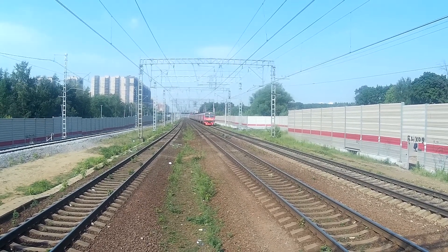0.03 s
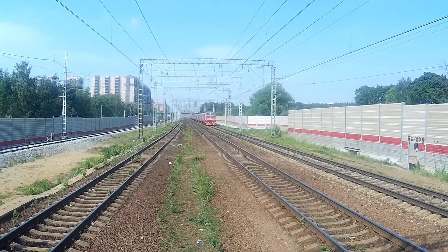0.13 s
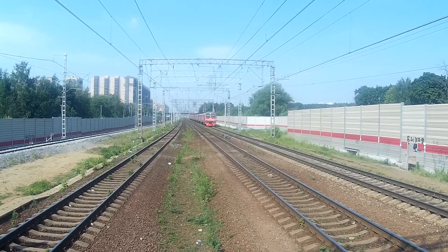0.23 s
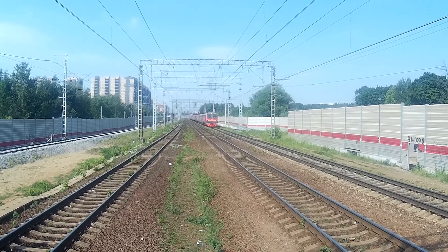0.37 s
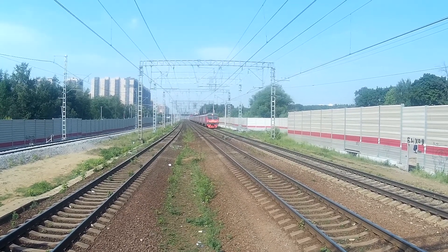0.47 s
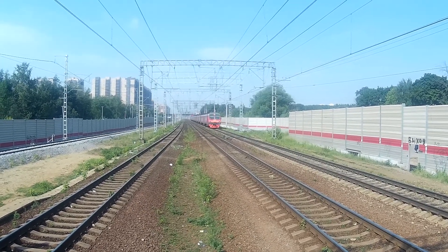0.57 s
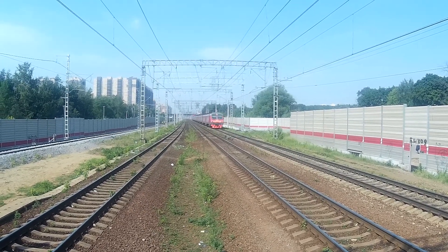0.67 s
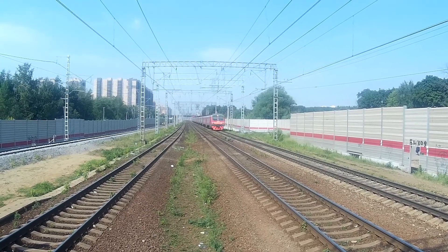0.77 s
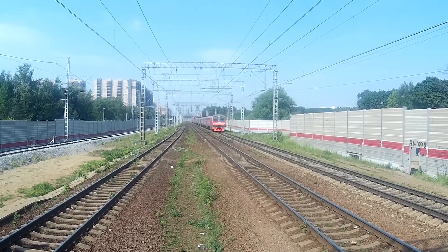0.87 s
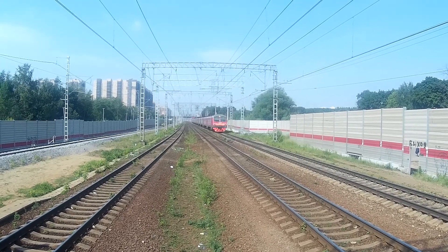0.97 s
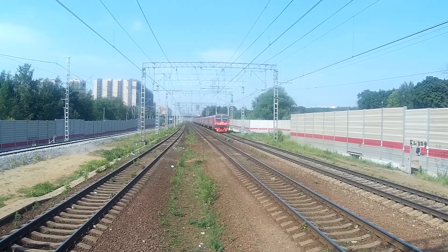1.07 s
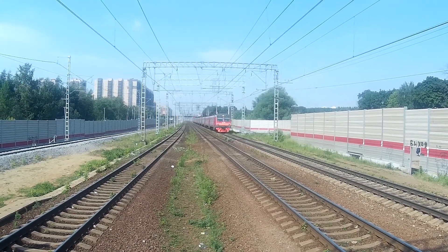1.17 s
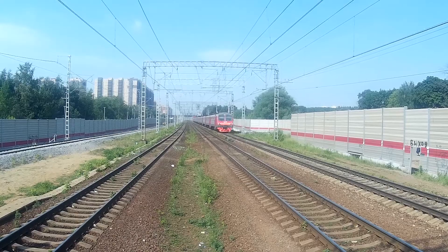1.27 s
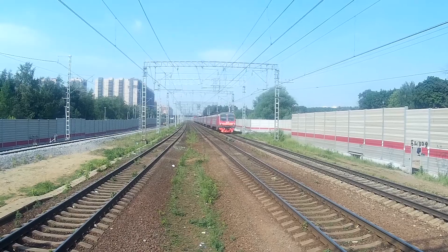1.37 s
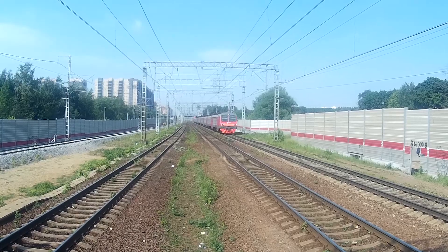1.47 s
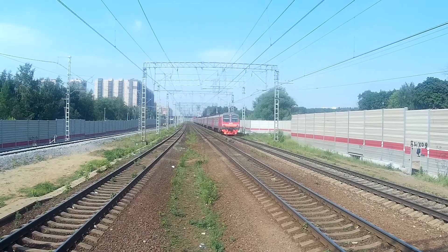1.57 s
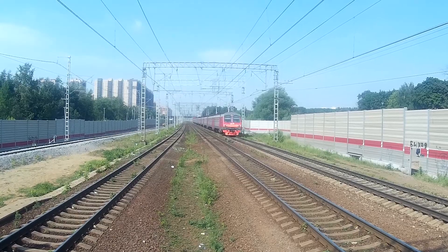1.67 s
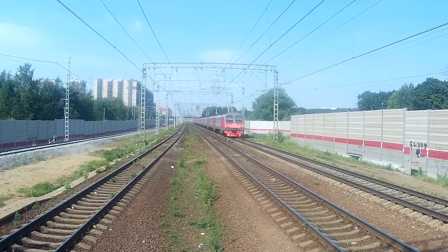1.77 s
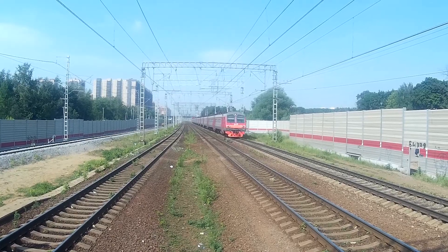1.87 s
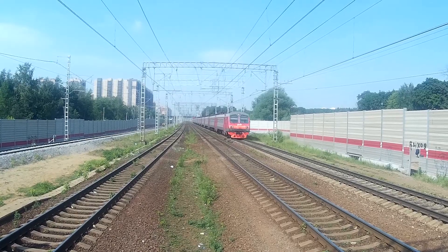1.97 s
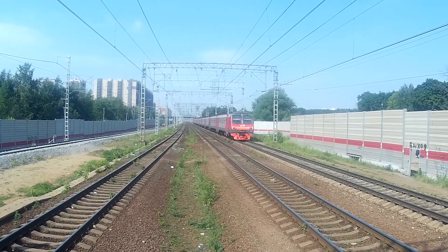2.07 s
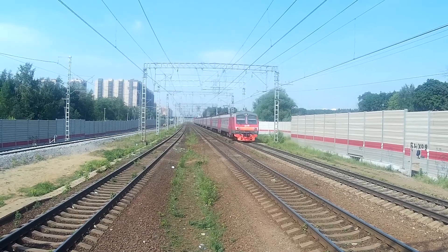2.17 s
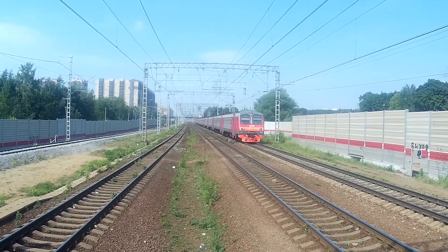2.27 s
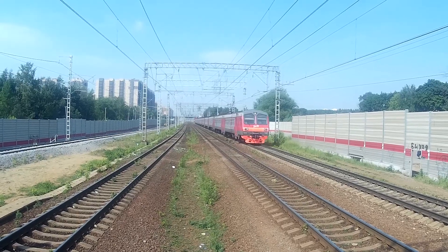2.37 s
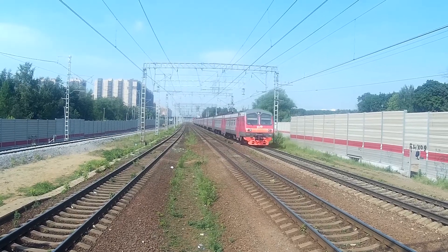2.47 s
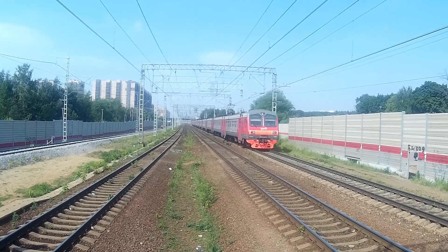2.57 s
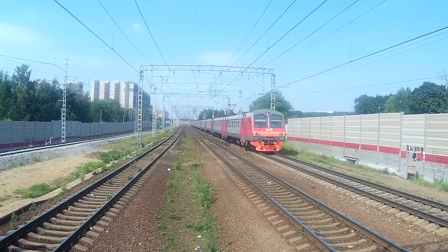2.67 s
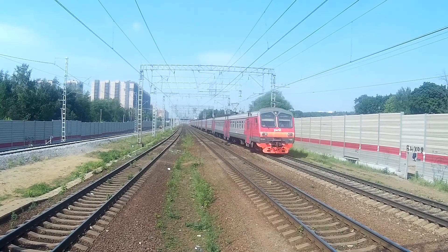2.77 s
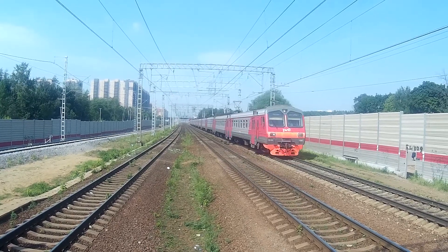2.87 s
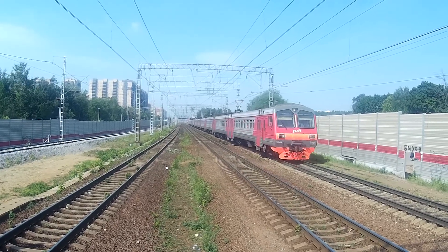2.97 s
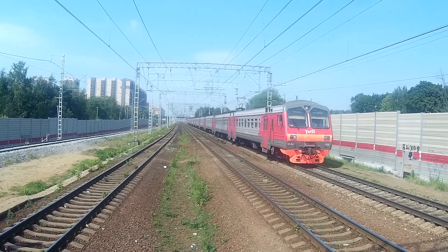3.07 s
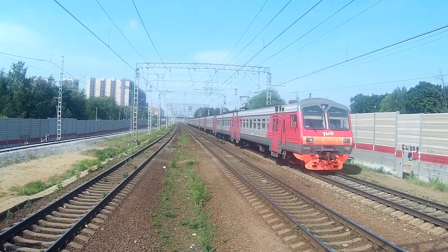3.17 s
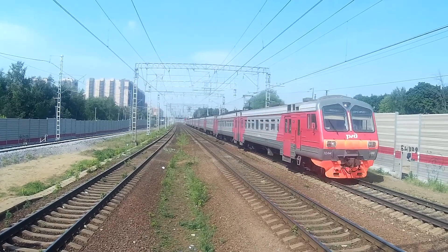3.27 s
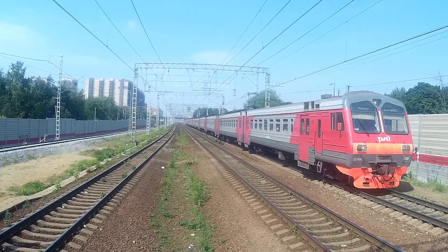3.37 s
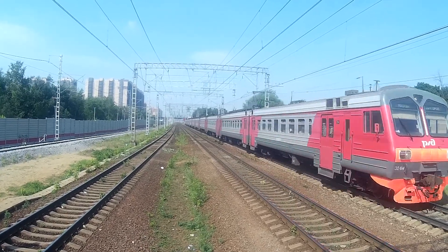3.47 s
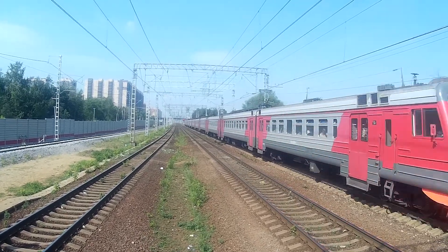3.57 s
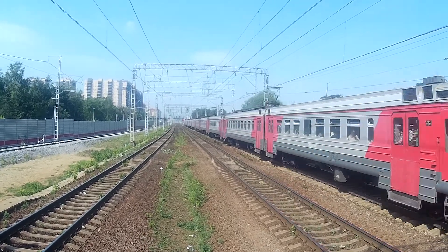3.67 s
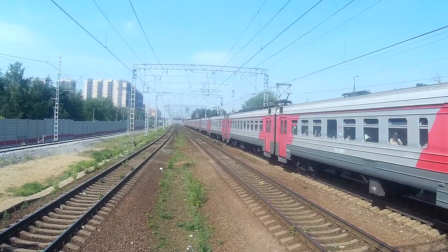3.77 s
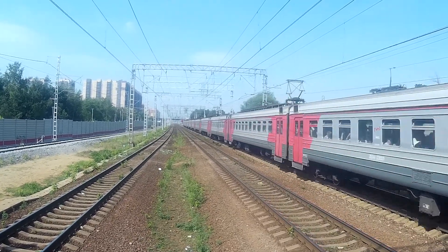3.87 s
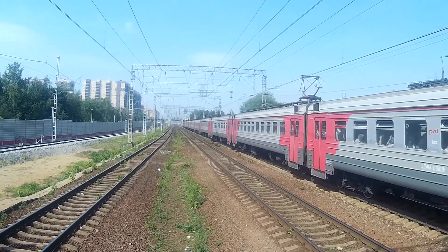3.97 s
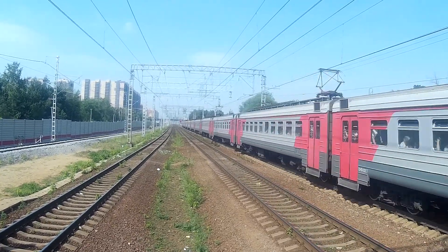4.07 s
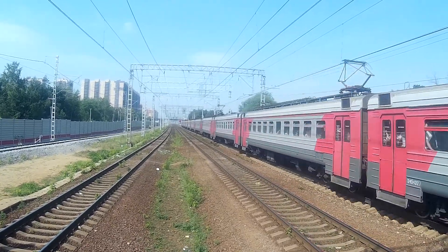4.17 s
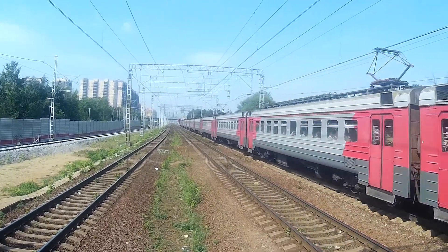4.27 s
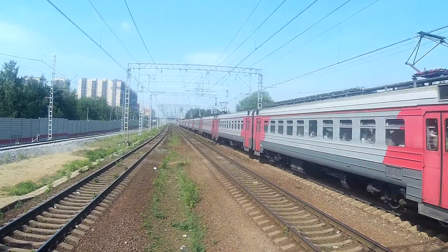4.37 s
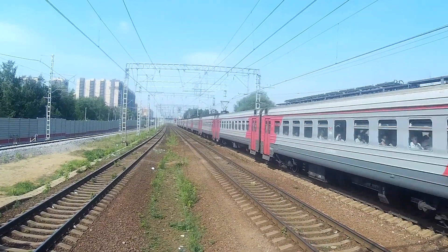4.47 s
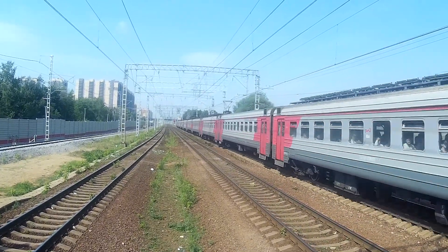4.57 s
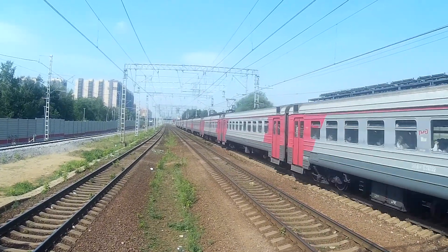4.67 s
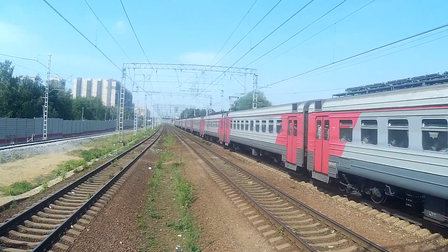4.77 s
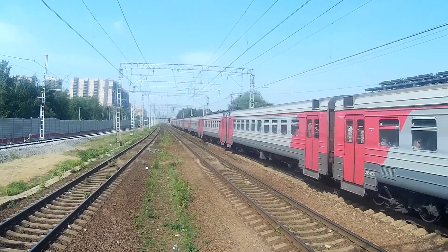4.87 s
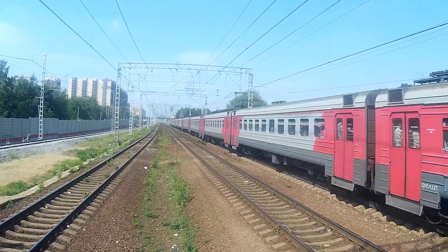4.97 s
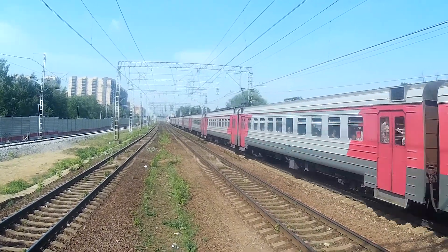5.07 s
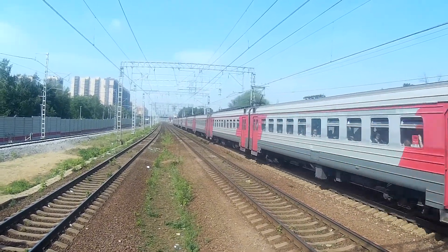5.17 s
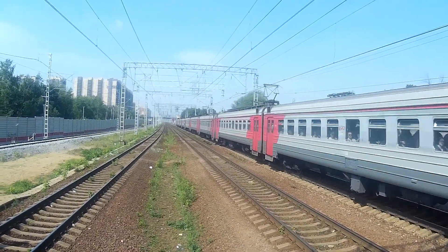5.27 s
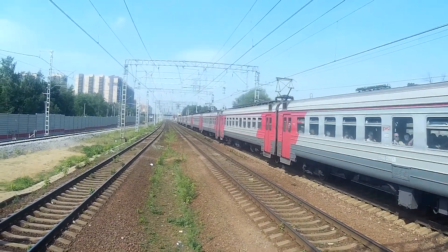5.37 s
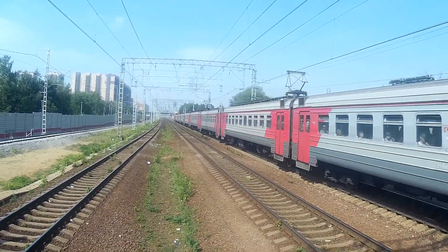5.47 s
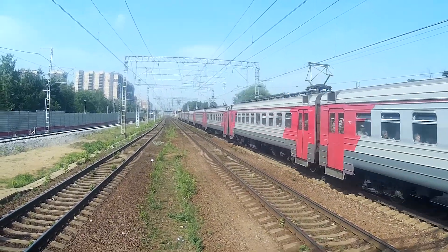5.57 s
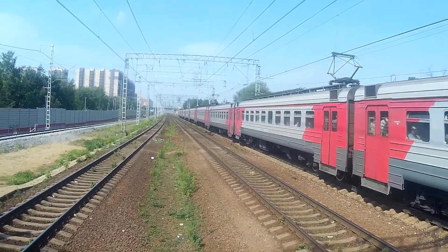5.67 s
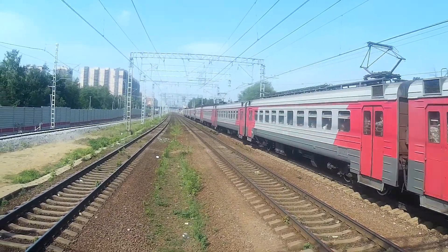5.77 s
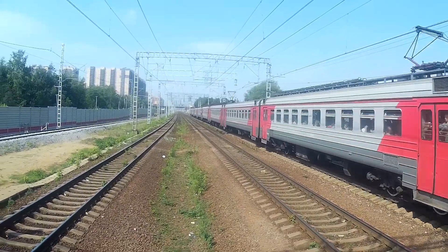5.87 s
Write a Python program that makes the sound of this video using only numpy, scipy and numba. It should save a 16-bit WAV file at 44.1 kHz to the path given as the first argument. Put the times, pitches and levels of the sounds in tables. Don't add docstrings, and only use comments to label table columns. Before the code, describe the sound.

A distant dull train hum builds, rails begin singing and knocking, then an electric train roars past close by, loud and distorted.

```python
import sys
import numpy as np
from scipy import signal
from scipy.fft import rfft, irfft
from scipy.io import wavfile
from scipy.ndimage import uniform_filter1d
from numba import njit

SR = 44100
rng = np.random.default_rng(int(sys.argv[2]) if len(sys.argv) > 2 else 0)


def inscribe(sig):
    pcm = np.round(np.clip(np.atleast_2d(sig).T, -1, 1) * 32767)
    wavfile.write(sys.argv[1], SR, pcm.astype(np.int16))


def makeup_ratio(level_db):
    decades = np.asarray(level_db, float) / 20
    return 10 ** decades


N = 261072
T = np.arange(N) / SR


@njit
def svf(x, centre_hz, width_hz):
    y = np.empty(len(x))
    band, low = 0., 0.
    for i in range(len(x)):
        g = np.tan(np.pi * centre_hz[i] / SR)
        k = width_hz / centre_hz[i]
        v = (band + g * (x[i] - low)) / (1 + g * (g + k))
        band = 2 * v - band
        low = low + 2 * g * v
        y[i] = k * v
    return y


def unit(x):
    return x / np.sqrt(np.mean(x ** 2))


def columns(table):
    start_s, *rest = np.transpose(table)
    return [np.interp(T, start_s, column) for column in rest]


def walk(rate_hz):
    hold = int(SR / rate_hz)
    steps = np.repeat(rng.standard_normal(N // hold + 1), hold)
    return 0.87 * uniform_filter1d(uniform_filter1d(steps, hold), hold)[:N]


def bands(colour, flicker_db, tilt_db=0):
    hz, db = np.transpose(colour)
    octave = np.log2(np.maximum(np.fft.rfftfreq(N, 1 / SR), 1))
    gain = makeup_ratio(np.interp(octave, np.log2(hz), db, -150, -150))
    shaped = rfft(rng.standard_normal(N)) * gain
    out = 0
    for centre in np.arange(4, 15):
        share = np.clip(1 - np.abs(octave - centre), 0, 1)
        part = irfft(shaped * share, N)
        level_db = flicker_db * walk(12) + tilt_db * (centre - np.log2(700))
        out = out + part * makeup_ratio(level_db)
    return out / np.std(irfft(shaped, N))


def ring(modes, flicker_db, drift):
    out = 0
    for hz, width_hz, db in modes:
        centre_hz = hz * (1 + drift * walk(5))
        once = svf(rng.standard_normal(N), centre_hz, 1.62 * width_hz)
        twice = unit(svf(once, centre_hz, 1.62 * width_hz))
        out = out + makeup_ratio(db + flicker_db * walk(15)) * twice * np.sqrt(width_hz / 100)
    return out


def arrive(start_s, rise_s):
    return np.clip((T - start_s) / rise_s, 0, 1)


# start_s, level_db
FAR_LEVEL = [(0.0, -49.5), (0.44, -47.5), (0.56, -48), (0.58, -48), (0.61, -48.5), (0.63, -46), (0.69, -47),
             (0.7, -48.5), (0.8, -46), (0.81, -48), (0.88, -46), (1.68, -43), (1.83, -39), (1.87, -41.5),
             (2.04, -41), (2.27, -39.5), (2.3, -38)]
# freq_hz, density_db_per_hz
FAR_COLOUR = [(71, -36), (120, -15), (156, -10.5), (255, -3.5), (326, -4.5), (416, -5), (532, -10.5),
              (928, -3), (1250, -9.5), (1570, -5.5), (1700, -8.5), (2780, -25), (3270, -30), (3670, -29.5),
              (6000, -47), (7800, -68.5), (13200, -120)]
# freq_hz, width_hz, level_db
FAR_MODES = [(801, 150, 1), (937, 79, -2.5), (1592, 105, -4.5)]


def far():
    noise = makeup_ratio(-0.5) * bands(FAR_COLOUR, 1.0)
    hum = makeup_ratio(-9.5) * ring(FAR_MODES, 0.84, drift=0.012)
    return makeup_ratio(columns(FAR_LEVEL)[0]) * (noise + hum)


# start_s, level_db
GROUND_LEVEL = [(0.0, -55), (0.1, -54), (0.26, -50), (0.33, -56), (0.53, -51.5), (0.61, -51), (0.66, -52.5),
                (1.09, -53), (1.71, -47), (2.06, -47.5), (2.39, -42), (2.46, -44), (2.54, -39),
                (2.64, -39.5), (2.93, -40), (3.08, -37), (3.36, -40), (3.43, -30.5), (3.66, -39.5),
                (3.72, -31.5), (4.24, -36.5), (4.3, -38), (4.66, -29.5), (4.75, -34), (4.81, -34),
                (5.13, -33), (5.19, -30), (5.31, -37), (5.62, -32.5), (5.67, -36), (5.74, -30.5),
                (5.85, -35.5), (5.92, -31)]
# freq_hz, density_db_per_hz
GROUND_COLOUR = [(11, -41), (18, -6.5), (54, 2.5), (97, -4.5), (170, -7), (220, -34), (370, -120)]


def ground():
    return makeup_ratio(columns(GROUND_LEVEL)[0]) * bands(GROUND_COLOUR, 0.95)


# start_s, low_modes_db, upper_modes_db
RAIL_LEVEL = [(1.4, -43, -66), (1.7, -45, -69), (1.78, -42, -65), (1.9, -46.5, -67), (2.2, -47, -66.5),
              (2.28, -40.5, -64), (2.38, -36, -55), (2.6, -31, -52), (2.85, -29.5, -50), (3.1, -25.5, -48),
              (3.33, -27.5, -46), (3.5, -26.5, -46), (3.66, -28, -50.5), (3.8, -28, -46), (4.0, -22, -46),
              (4.2, -25, -49), (4.4, -22, -46), (4.7, -27, -44), (5.1, -28, -50), (5.5, -24, -49.5),
              (5.92, -27.5, -49.5)]
# freq_hz, width_hz, level_db
RAIL_LOW_MODES = [(389, 134, -9.5), (784, 94, -5.5), (1124, 115, -3.5), (1650, 156, -6.5), (1556, 136, -7),
                  (2110, 235, -14.5), (2427, 120, -20.5), (2744, 340, -26)]
RAIL_HIGH_MODES = [(3780, 133, -1.5), (4220, 240, -5.5), (3527, 120, -5), (4590, 300, -13),
                   (5240, 180, -13.5), (5830, 600, -22.5)]
# start_s, lower_pitch_hz, upper_tone_db
WHINE = [(2.2, 976, -47), (2.24, 940, -47), (2.35, 960, -34), (2.72, 966, -33), (2.83, 977, -23.5),
         (2.88, 978, -35.5), (3.01, 984, -29), (3.06, 990, -34), (3.15, 990, -25.5), (3.55, 1010, -38.5),
         (3.6, 1010, -17), (3.67, 983, -33), (3.74, 990, -23), (3.79, 986, -27.5), (4.13, 988, -34),
         (4.18, 982, -21.5), (4.5, 990, -20)]


def rail():
    low_db, high_db = columns(RAIL_LEVEL)
    lower_hz, upper_db = columns(WHINE)
    song = makeup_ratio(low_db) * ring(RAIL_LOW_MODES, 2.25, drift=0.004)
    song = song + makeup_ratio(high_db - 0.5) * ring(RAIL_HIGH_MODES, 0.8, drift=0.004)
    slewed_hz = uniform_filter1d(lower_hz, int(0.3 * SR))
    lower = makeup_ratio(low_db + 1.5) * ring([(slewed_hz, 70, 0)], 1.7, drift=0.004)
    upper_gain = (1 - 0.6 * arrive(4.15, 0.4)) * arrive(2.0, 0.3) * makeup_ratio(upper_db + 0.5)
    upper = upper_gain * ring([(1663, 63, 0)], 1.2, drift=0.0061)
    return arrive(1.17, 1.0) * (song + lower) + upper


# start_s, peak_db, pitch_hz
KNOCKS = [
    (1.561, -26, 926),
    (1.757, -20.5, 1490),
    (1.819, -23, 856),
    (2.158, -25.5, 1020),
    (2.549, -12, 895),
    (2.998, -3.5, 1680),
]


def knocks():
    out, t = np.zeros(N), T[:2000]
    for start_s, peak_db, pitch_hz in KNOCKS:
        i = int(start_s * SR)
        blow = np.exp(-t / 0.004) * (1 - np.exp(-t / 0.0015)) ** 2
        out[i:i + len(t)] += makeup_ratio(peak_db - 1) * blow * np.sin(2 * np.pi * pitch_hz * t)
    return svf(out, np.full(N, 1300.), 2200.)


# start_s, level_db
AIR_LEVEL = [(2.2, -80), (2.204, -85), (2.242, -74), (2.258, -83), (2.27, -72), (2.416, -69.5), (3.16, -63),
             (3.21, -65), (3.366, -62.5), (3.688, -65.5), (4.15, -61.5)]
# freq_hz, density_db_per_hz
AIR_COLOUR = [(3290, -31.5), (5600, -3.5), (6880, -9), (7920, -6), (9150, -16), (11000, -9.5),
              (15000, -29.5)]


def air():
    return arrive(2.05, 0.5) * makeup_ratio(columns(AIR_LEVEL)[0] + 5.0) * bands(AIR_COLOUR, 0.8)


# start_s, level_db
WHEEL_LEVEL = [(2.2, -55), (2.5, -42), (2.8, -36), (3.1, -39.5), (3.4, -29.5), (3.6, -27), (3.75, -25.5),
               (3.88, -22.5), (3.95, -19.5), (4.05, -21.5), (4.15, -17), (4.25, -16.5), (4.4, -17),
               (4.5, -14), (4.56, -16.5), (4.68, -13.5), (4.75, -16.5), (4.85, -16.5), (5.0, -13),
               (5.1, -14.5), (5.2, -15.5), (5.27, -14.5), (5.33, -17.5), (5.4, -15.5), (5.47, -16.5),
               (5.57, -17.5), (5.7, -16), (5.8, -15.5), (5.92, -15)]
# freq_hz, density_db_per_hz
WHEEL_COLOUR = [(59, -38), (100, -19), (209, -13.5), (489, -0.5), (558, -2.5), (679, 0), (854, -1),
                (942, -0.5), (1370, -6), (1620, -8.5), (1780, -12.5), (2070, -15.5), (3010, -39.5),
                (4250, -39.5), (5000, -43), (6500, -69), (11000, -120)]


def wheels():
    tilt_db = 2.5 - 2.15 * arrive(2.9, 0.92)
    return arrive(2.1, 0.4) * makeup_ratio(columns(WHEEL_LEVEL)[0] + 3.5) * bands(WHEEL_COLOUR, 0.92, tilt_db)


# start_s, level_db
BOOM_LEVEL = [(2.2, -43), (2.7, -35.5), (2.77, -45), (3.14, -29.5), (3.21, -34), (3.62, -26.5), (3.76, -49),
              (3.87, -46), (3.96, -44.5), (4.07, -38), (4.44, -24), (4.5, -33), (4.77, -16.5), (4.87, -28),
              (4.92, -22.5), (5.62, -30.5), (5.81, -23.5), (5.92, -35)]


def bogies():
    return arrive(2.15, 0.5) * makeup_ratio(columns(BOOM_LEVEL)[0] - 5.0) * ring([(254, 77, 0)], 1.8, drift=0.048)


# start_s, low_db, web_db, middle_db, squeal_db
RIM_LEVEL = [(3.8, -29, -22, -42, -44), (3.93, -25, -21, -37, -47), (4.47, -15, -19, -27, -41.5),
             (4.54, -7, -23, -25, -43), (4.57, -21, -19, -24.5, -43.5), (4.67, -13.5, -14, -30, -43),
             (4.7, -21.5, -13, -25.5, -44), (4.74, -14.5, -17, -31, -44), (4.8, -12, -25, -26, -47),
             (4.85, -16, -20.5, -23, -47), (5.22, -20, -20.5, -31.5, -45), (5.65, -22.5, -16.5, -33, -43),
             (5.69, -22.5, -11, -35, -47), (5.92, -27, -13.5, -35, -47)]
# freq_hz, width_hz, level_db
RIM_LOW = [(690.3, 46.5, 2.5), (555, 63, -6)]
RIM_WEB = [(1010, 82, 2), (870, 65, -3.5), (1413, 105, -7.5)]
RIM_MIDDLE = [(2106, 170, -0.5), (2380, 150, -5.5)]
RIM_SQUEAL = [(4150, 250, -1), (5150, 360, -12)]


def rims():
    low_db, web_db, middle_db, squeal_db = columns(RIM_LEVEL)
    low = makeup_ratio(low_db - 3.5) * ring(RIM_LOW, 2.9, drift=0.04)
    web = makeup_ratio(web_db - 5.0) * ring(RIM_WEB, 3.2, drift=0.037)
    middle = makeup_ratio(middle_db - 4.0) * ring(RIM_MIDDLE, 0.83, drift=0.025)
    squeal = makeup_ratio(squeal_db - 4.0) * ring(RIM_SQUEAL, 3.7, drift=0.012)
    return arrive(3.62, 0.77) * (low + web + middle + squeal)


# centre_s, swell_db, half_length_s
THUMPS = [(4.247, 2.5, 0.0079), (4.295, 0.5, 0.0046), (4.34, 0, 0.0066), (4.39, -0.9, 0.01),
          (4.471, 1, 0.0084), (4.512, 1.1, 0.01), (4.592, 1.3, 0.021), (4.65, -1, 0.005),
          (4.684, 1.5, 0.016), (4.757, 0, 0.006), (4.793, 4, 0.017), (4.841, 2.5, 0.005),
          (4.891, 2.5, 0.02), (4.959, -0.5, 0.0081), (4.996, 2, 0.0051), (5.046, -1, 0.026),
          (5.095, -2, 0.0077), (5.13, 1.4, 0.0081), (5.235, 1.5, 0.01), (5.278, 0.6, 0.018),
          (5.309, 3, 0.0055), (5.352, 0.2, 0.0055), (5.37, 0, 0.016), (5.412, -1, 0.033),
          (5.461, 1.7, 0.014), (5.498, 2.7, 0.003), (5.524, 2, 0.0032), (5.554, 0, 0.0087),
          (5.62, -0.5, 0.016), (5.696, 1.5, 0.01), (5.745, -0.5, 0.0081), (5.787, 0, 0.012),
          (5.835, 0, 0.017), (5.877, 0.8, 0.002)]


def thumps(roar):
    quick = uniform_filter1d(roar ** 2, int(0.012 * SR)) + 1e-12
    slow = uniform_filter1d(roar ** 2, int(0.08 * SR)) + 1e-12
    evenness = 0.23 * arrive(3.92, 0.2)
    swell_db = 0
    for centre_s, peak_db, half_length_s in THUMPS:
        bump = np.exp(-((T - centre_s) / half_length_s) ** 2)
        swell_db = np.maximum(swell_db, (peak_db + 1.5) * bump)
    return roar * (slow / quick) ** evenness * makeup_ratio(swell_db)


def scene():
    distant = far() + ground()
    steel = thumps(rail() + wheels() + rims())
    return (distant + steel + knocks() + air() + bogies())[None]


def top_cut(x):
    return signal.sosfilt(signal.butter(12, 15820, fs=SR, output="sos"), x)


# freq_hz, width_hz, depth_0_1
DIPS = [(3250, 390, 0.24), (9100, 1800, .2)]


def record(dry):
    overload, hiss_db = 0.69, -68
    x = dry[0]
    for hz, width_hz, depth in DIPS:
        x = x - depth * svf(x, np.full(N, 1. * hz), 1. * width_hz)
    x = np.clip(x, -overload, overload) + makeup_ratio(hiss_db) * rng.standard_normal(N)
    x = signal.sosfilt(signal.butter(1, 22, "high", fs=SR, output="sos"), x)
    return top_cut(x[None])


dry = scene()
out = record(dry)
inscribe(out)
```